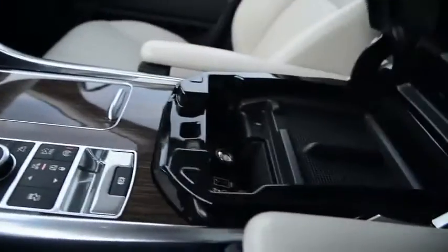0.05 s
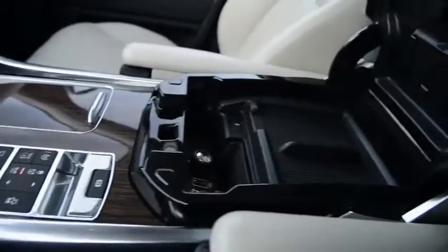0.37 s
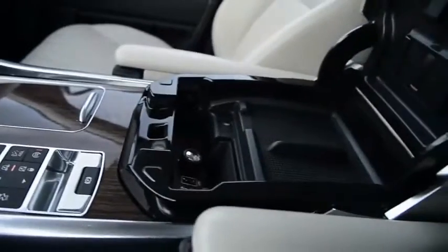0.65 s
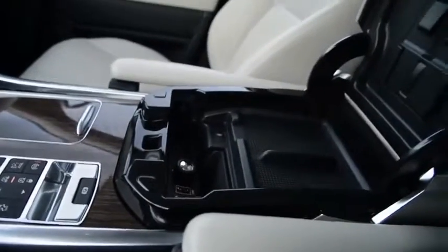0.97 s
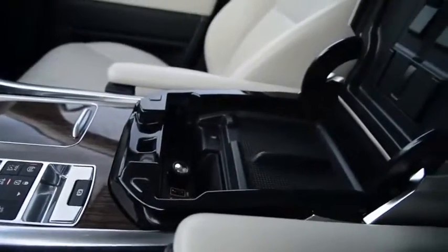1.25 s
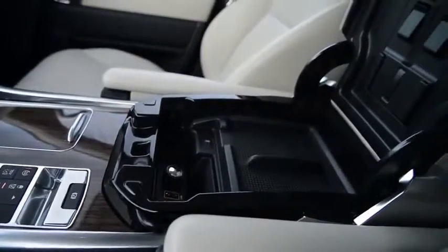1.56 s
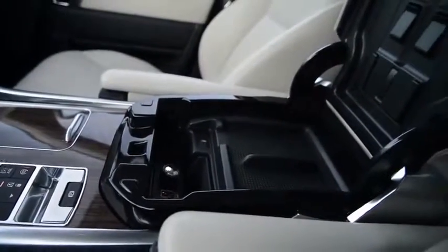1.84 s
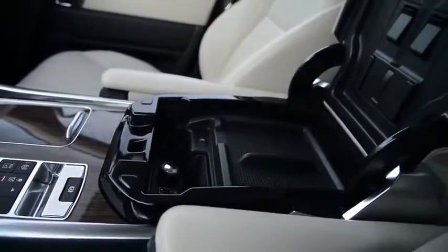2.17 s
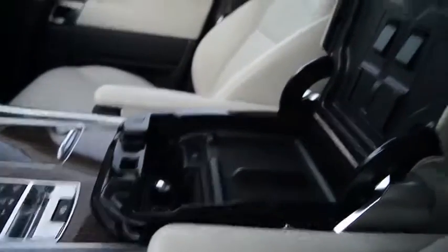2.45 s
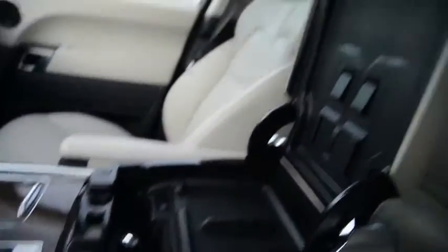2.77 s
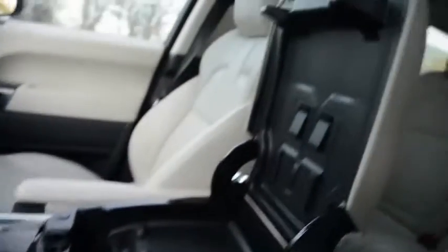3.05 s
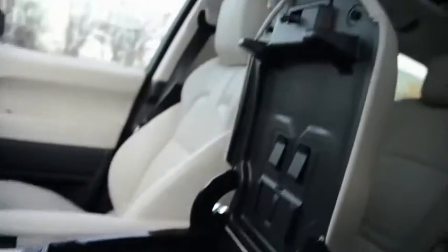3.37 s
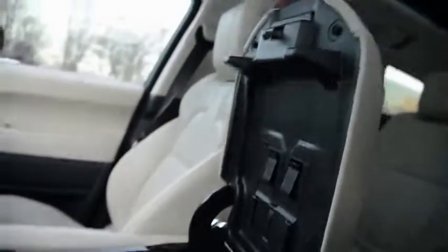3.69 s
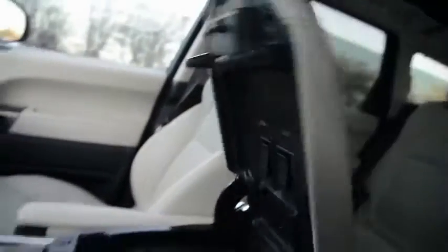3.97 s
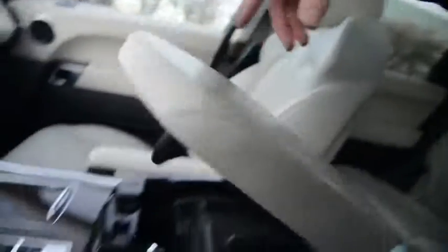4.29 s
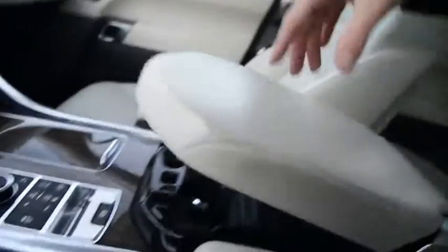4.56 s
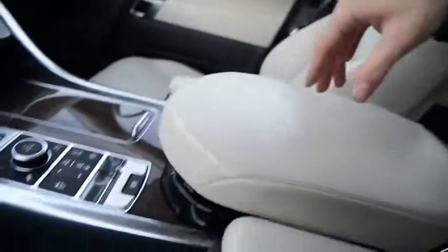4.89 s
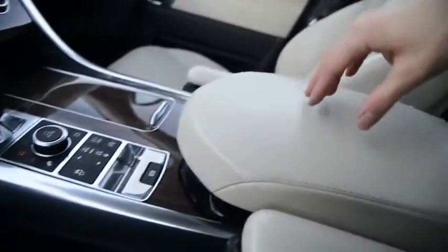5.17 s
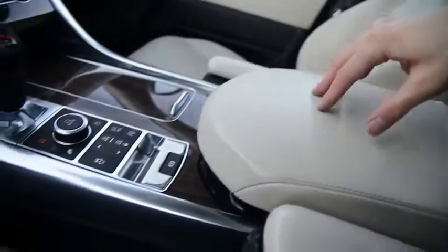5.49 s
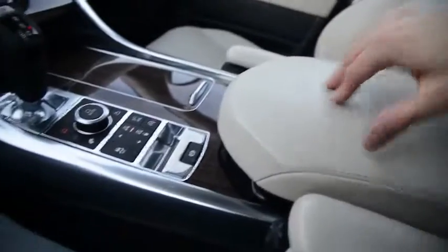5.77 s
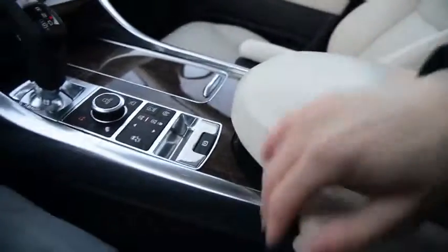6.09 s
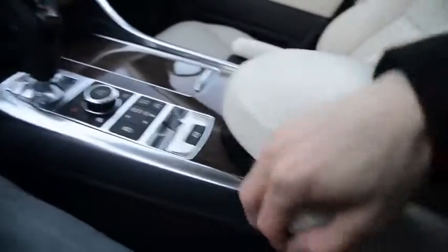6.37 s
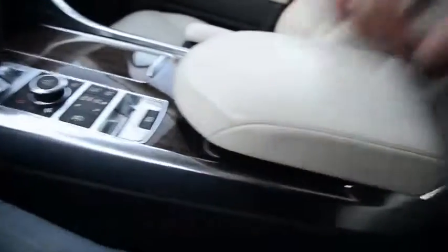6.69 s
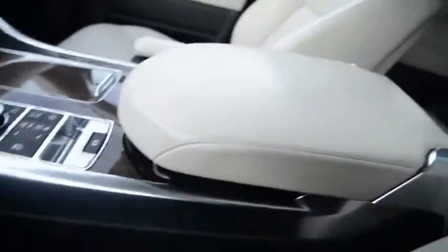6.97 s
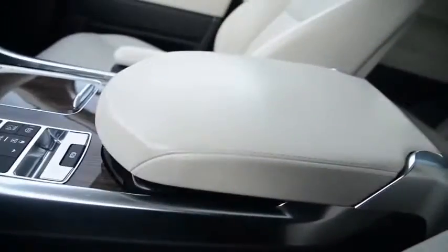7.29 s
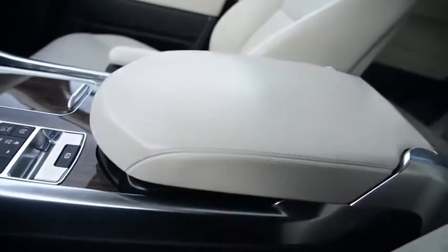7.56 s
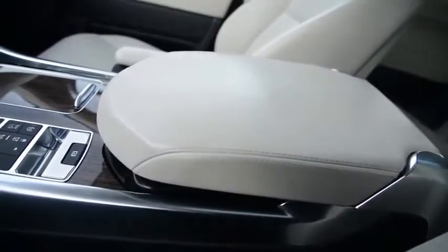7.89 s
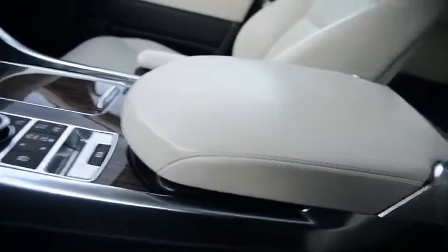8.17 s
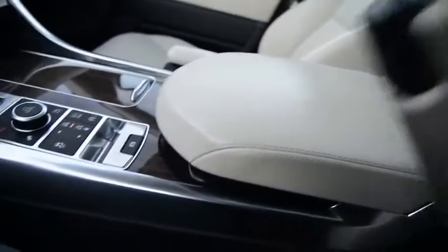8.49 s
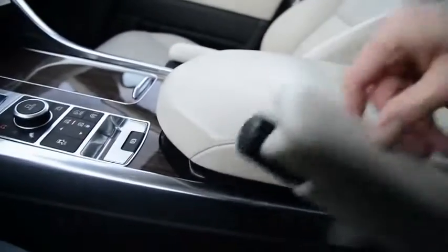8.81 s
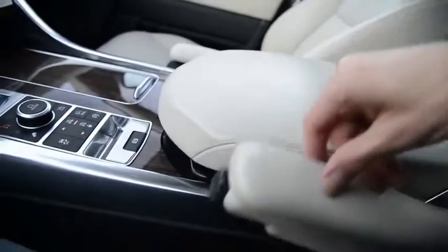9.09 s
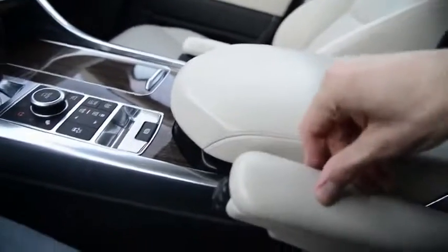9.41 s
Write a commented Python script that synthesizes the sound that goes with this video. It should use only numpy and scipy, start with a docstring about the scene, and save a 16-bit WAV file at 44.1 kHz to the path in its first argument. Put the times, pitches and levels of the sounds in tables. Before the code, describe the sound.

Heard close up inside a parked car, the engine idles with a steady low hum, cabin rumble and a faint fan whine. A plastic console tray knocks once, followed by a few light ticks. About halfway through, the padded lid lands with a hollow thunk and its latch snaps shut, the loudest moment. Afterwards come a few small clicks and the soft rubbing of a sleeve and leather as an armrest is moved.

```python
"""Centre console in an idling car

Inside a parked car a six-cylinder engine hums in periodic firing pulses, over cabin rumble and a faint
fan whine. A hand clicks the plastic tray, lowers the padded lid and presses it until the latch snaps;
each impact excites the console's resonant modes. Then an armrest swings up and down, and leather and
sleeve rub softly by stick-slip friction."""
import sys
import numpy as np
from scipy import signal
from scipy.fft import rfft, irfft, next_fast_len
from scipy.io import wavfile

SR = 44100
rng = np.random.default_rng(int(sys.argv[2]) if len(sys.argv) > 2 else 0)


def generate_wav(sig):
    """Save sig (samples, or channels by samples) to the path in sys.argv[1] as 16-bit PCM at SR."""
    pcm = np.round(np.clip(np.atleast_2d(sig).T, -1, 1) * 32767).astype(np.int16)
    wavfile.write(sys.argv[1], SR, pcm)


N = 425124


def from_db(db):
    """Amplitude ratio of a level in decibels."""
    return 10 ** (np.asarray(db) / 20)


def unit_rms(x):
    """Normalisation to unit mean power."""
    return x / np.sqrt(np.mean(x ** 2) + 1e-20)


def in_time(rows):
    """Linear interpolation in time, one curve per value column."""
    times_s, *columns = np.transpose(rows)
    return [np.interp(np.arange(N) / SR, times_s, column) for column in columns]


def at_hz(points, hz):
    """Interpolation on a logarithmic frequency axis."""
    points_hz, values = np.transpose(points)
    return np.interp(np.log(hz + 1e-9), np.log(points_hz), values)


def panned(db):
    """Interaural level difference, left minus right, as a pair of gains."""
    return from_db(np.array([[.5], [-.5]]) * db)


def drift(rate_hz):
    """Random modulation: low-pass noise of unit rms."""
    hz = np.fft.rfftfreq(N // 40, 40 / SR)
    slow = irfft(rfft(rng.standard_normal(N // 40)) / (1 + (hz / rate_hz) ** 2))
    return np.interp(np.linspace(0, len(slow) - 1, N), np.arange(len(slow)), unit_rms(slow))


def resonate(x, hz, width_hz):
    """Damped resonance: two poles, unit gain at the peak."""
    radius = np.exp(-np.pi * width_hz / SR)
    feedback = [1, -2 * radius * np.cos(2 * np.pi * hz / SR), radius ** 2]
    return signal.lfilter(np.array([1, 0, -1]) * (1 - radius ** 2) / 2, feedback, x)


def narrow_noise(hz, width_hz, size):
    """Narrow-band stereo noise: white noise passed twice through a resonance; unit rms."""
    white = rng.standard_normal((2, size))
    return unit_rms(resonate(resonate(white, hz, width_hz), hz, width_hz))


def cabin_noise(spectrum, size=N):
    """Interaural coherence: coloured noise, alike at both ears in the bass, diffuse above; unit rms."""
    # likeness of the two ears: frequency_hz, correlation (clipped to 1)
    coherence = [(60, 0.66), (130, 1.3), (290, 0.26), (640, -0.18), (12000, 0.11)]
    # left level over right: frequency_hz, difference_db
    balance = [(60, 5.5), (110, 0), (250, -2), (700, -3.5), (2400, 0), (4400, 0), (10000, 1)]
    padded = next_fast_len(size, real=True)
    hz = np.fft.rfftfreq(padded, 1 / SR)
    mid, side = rfft(rng.standard_normal((2, padded)))
    alike = np.clip(at_hz(coherence, hz), -1, 1)
    ears = np.sqrt(1 + alike) * mid + np.sqrt(1 - alike) * side * [[1], [-1]]
    low_cut = 1 / (1 + (spectrum[0][0] / (hz + 1) / 1.3) ** 6)
    high_cut = 1 / (1 + (hz / spectrum[-1][0] / 1.3) ** 6)
    colour = low_cut * high_cut * from_db(at_hz(spectrum, hz))
    return unit_rms(irfft(ears * colour * panned(at_hz(balance, hz)), padded)[:, :size])


def add(out, start_s, sound):
    """Superposition of a short sound at a given time."""
    start = round(start_s * SR)
    out[:, start:start + sound.shape[-1]] += sound[..., :N - start]


def engine(upper_pan_db=-3.0, left_lead_s=0.00063):
    """Harmonic series: overtones align in one pulse per firing and follow the idle speed, wavering."""
    # idle speed and strength of the firing tone: time_s, firing_hz, level_db
    idle = [(0, 42.11, -25), (0.8, 41.74, -25), (2.3, 41.92, -25.5), (2.7, 42.2, -24.8),
            (4.9, 41.89, -25.5), (5.35, 42.32, -24.9), (5.9, 41.86, -25.7), (6.8, 42.14, -24.5),
            (8.1, 43.08, -24.5), (8.6, 42.72, -25), (9.15, 41.5, -26.5), (9.64, 41.84, -26.5)]
    # partials of the firing tone: multiple, relative_db, unsteadiness (0-1)
    # 5/6 comes from uneven cylinders, 3.4 from a belt-driven part
    partials = [(5 / 6, -34, .3), (1, 0, 0.028), (2, -23, 0.39), (3, -15.5, 0.1), (3.386, -17.5, 0.21),
                (6.66, -32.5, 0.48), (9.85, -36, 0.31)]
    firing_hz, firing_db = in_time(idle)
    cycles = np.cumsum(firing_hz) / SR + np.array([[1], [0]]) * firing_hz * left_lead_s
    phase, out = 2 * np.pi * cycles - np.pi / 2, 0
    for multiple, db, unsteady in partials:
        amplitude = 1 + unsteady * drift(rate_hz=3.8)
        tone = amplitude * np.cos(multiple * phase + unsteady * drift(rate_hz=4.9))
        out = out + from_db(db) * panned(upper_pan_db * (multiple > 2)) * unit_rms(tone)
    return out * from_db(firing_db)


def rumble(level_db=-36.5, waver_db=0.5):
    """Structure-borne noise: the body shell passes mostly low frequencies."""
    # spectral density: frequency_hz, relative_db
    spectrum = [(18, 7.5), (32, -2), (60, -1.5), (100, -7), (150, -9.5), (205, -10.5), (245, -14),
                (290, -10), (340, -22.5), (430, -21), (560, -25.5), (900, -27.5), (1500, -36.5),
                (3000, -52.5)]
    return from_db(level_db + waver_db * drift(rate_hz=4.9)) * cabin_noise(spectrum)


def whistle(hz, waver_hz):
    """Frequency modulation: a wavering tone, a sixth of a cycle apart at the two ears; unit rms."""
    phase = 2 * np.pi * np.cumsum(hz + waver_hz * drift(rate_hz=21.1)) / SR
    return unit_rms(np.sin(phase + np.array([[0], [np.pi / 3]])))


def fan_whine(pitch_hz=800, gain_db=4.5, pan_db=-5.0):
    """Tonal fan noise: a tone beats with an equally strong narrow band of noise around it."""
    # rise and fall of the whine: time_s, relative_db
    swell = [(0, -76), (0.5, -75), (0.85, -66.5), (1.7, -65), (2.05, -68), (2.9, -62.5), (4.0, -65),
             (4.7, -72.5), (6.1, -72.5), (7.0, -67.5), (9.64, -71)]
    flutter = narrow_noise(pitch_hz, width_hz=24, size=N)
    whine = unit_rms(flutter + whistle(pitch_hz, waver_hz=7))
    return from_db(in_time(swell)[0] + gain_db) * whine * panned(pan_db)


def cabin_air(hiss_db=-67.5):
    """Line and continuous spectra: thin whistles stand over a fine hiss."""
    # steady whistles: pitch_hz, level_db
    tones = [(3870, -88), (3942, -81.5), (7770, -93), (7845, -88)]
    # spectral density of the hiss: frequency_hz, relative_db
    spectrum = [(1000, 1), (2400, -2), (3300, -2.7), (7000, -1.1), (9500, -1.7), (15500, -1.3)]
    whistles = sum(from_db(db) * whistle(hz, waver_hz=20) for hz, db in tones)
    return whistles + from_db(hiss_db) * cabin_noise(spectrum)


def stroke_gains(release_s=.025, resting_rasp_db=-68.5, resting_swish_db=-74):
    """Incoherent sources add in power: envelopes of rasp and swish as strokes swell, hold and stop."""
    # hand, sleeve and armrest: start_s, end_s, swell_s, rasp_db, growth_db_per_s, swish_offset_db
    strokes = [(0, 0.62, 0.013, -63, -2.5, -7.5), (0.844, 1.0, 0.094, -58, 0, -13),
               (1.196, 1.5, .15, -64.5, 0, -12), (2.72, 3.1, 0.16, -58, -14, -9.5),
               (3.137, 3.7, 0.045, -65.5, -9, -8), (3.857, 4.07, 0.081, -58, -12, -9),
               (4.15, 4.9, 0.073, -64, -18, -6.5), (5.799, 6.55, 0.27, -64, -2, -7),
               (6.425, 7.24, 0.38, -51.5, 4.5, -5.5), (7.499, 7.8, .12, -63.5, -5, -11),
               (7.897, 8.82, 0.21, -51.5, -6, -7), (8.804, 9.327, 0.059, -60, -1, -7)]
    t = np.arange(N) / SR
    # clothes never lie quite still
    rasp, swish = from_db(resting_rasp_db) ** 2, from_db(resting_swish_db) ** 2
    for start_s, end_s, swell_s, db, growth_db_per_s, swish_offset_db in strokes:
        attack = np.clip((t - start_s) / swell_s, 0, 1)
        hold = from_db(db + growth_db_per_s * np.clip(t - start_s - swell_s, 0, end_s - start_s))
        release = np.exp(-np.maximum(t - end_s, 0) / release_s)
        power = (attack * hold * release) ** 2
        rasp = rasp + power
        swish = swish + power * from_db(swish_offset_db) ** 2
    return np.sqrt(rasp), np.sqrt(swish)


def through_cabin(source, spectrum, t60_s=0.086):
    """Reverberation: a source reaches each ear by its own short, dense reflections; unit rms."""
    t = np.arange(SR // 8) / SR
    reflections = cabin_noise(spectrum, size=len(t)) * from_db(-60 * t / t60_s)
    return unit_rms(signal.fftconvolve(source[None], reflections, axes=1)[:, :N])


def rubbing(rasp_gain_db=2.5, grain_db=3.5, grain_hz=120, moving_share=0.47, pan_db=-3.0):
    """Stick-slip friction: leather and cloth slide with a fine grain, sounding panel and surface."""
    # rasp of the panel: frequency_hz, relative_db
    rasp = [(350, -3), (750, 2.5), (950, -1), (1300, 0.5), (1580, 0), (1900, 0), (2150, 0.5), (2380, -2.5),
            (2580, -4), (2900, -14.5), (4000, -40)]
    # swish of the surface: frequency_hz, relative_db
    swish = [(2000, -33), (3000, 2), (4000, 1.5), (6000, 1), (7200, -3), (8100, -9), (9200, -15.5),
             (11500, -9.5), (15500, -13.5)]
    friction = rng.standard_normal(N) * from_db(grain_db * drift(grain_hz))
    rasp_gain, swish_gain = stroke_gains()
    out = 0
    for spectrum, gain in (rasp, rasp_gain * from_db(rasp_gain_db)), (swish, swish_gain):
        still = np.sqrt(1 - moving_share) * through_cabin(friction, spectrum)
        # the moving share of the contact smears the cabin's colouring
        moving = np.sqrt(moving_share) * cabin_noise(spectrum)
        out = out + gain * (still + moving)
    return out * panned(pan_db)


def contact(levels_db, pitch_hz, ring_q=8, ring_db=5, plain_db=-24, body_s=0.0094):
    """Impulse response: a crack and its reflections off the near trim, coloured by the console's modes."""
    # four bands of a click: low_hz, high_hz, gain_db, t60_s, crack_ratio (direct over reflected)
    registers = [(310, 1184, -1.5, 0.081, 11.3), (1073, 2240, -0.5, 0.067, 5.6),
                 (3050, 7130, -0.5, 0.071, 1.4), (7760, 15000, 0, 0.057, .6)]
    # console resonances: frequency_hz, width_hz, gain_db
    modes = [(388, 31, 0), (470, 18, -0.5), (521, 114, 2), (730, 97, 3), (900, 210, -6), (1177, 210, -2),
             (1578, 70, -1.5), (1775, 200, -11.5), (2184, 200, -8.5), (2460, 200, -10), (3370, 380, -20),
             (4300, 1200, -14), (6400, 1200, -16), (7200, 530, -17.5), (11500, 3600, -15)]
    rise_s, tail_db, tail_t60_s = .0016, -32, .18
    t, out = np.arange(SR // 8) / SR, 0
    # the reflections take a moment to build up behind the direct crack
    scatter = cabin_noise([(100, 0), (16000, 0)], size=len(t)) * (1 - np.exp(-t / rise_s))
    tail = from_db(tail_db - 60 * t / tail_t60_s)
    for (low_hz, high_hz, gain_db, t60_s, crack), db in zip(registers, levels_db):
        blow = scatter * (from_db(-60 * t / t60_s) + tail)
        blow[:, 0] += crack
        rung = sum(from_db(mode_db) * resonate(blow, hz, width) for hz, width, mode_db in modes)
        rung += from_db(plain_db) * blow
        # the touched part adds a pitch of its own
        rung += from_db(ring_db) * resonate(rung, pitch_hz, pitch_hz / ring_q)
        band = signal.sosfilt(signal.butter(3, [low_hz, high_hz], "band", fs=SR, output="sos"), rung)
        # a register's level is its energy spread over the short body of the click
        body_rms = np.sqrt(np.sum(band ** 2, axis=1, keepdims=True) / (body_s * SR))
        out = out + from_db(db + gain_db) * band / body_rms
    return out


def clicks():
    """Impacts of tray, hinge and latch: heavy ones fill the lowest register, soft ones lack treble."""
    # plastic contacts: time_s, level_db, weight_db, slope_db_per_register, pitch_hz, pan_db
    contacts = [(0.7425, -44, -14, -10, 3270, -3), (0.986, -38, 5, -24, 860, -11),
                (0.994, -41, -5, -8, 1117, -6), (0.9979, -33, -1.5, -9.5, 1800, 0),
                (1.058, -54.5, 6, -13, 841, -6), (2.801, -64, 17.5, -14, 716, -10),
                (2.84, -53.5, 10.5, -15, 680, -6), (3.079, -52.5, 8, -27, 1703, -6),
                (3.221, -52, -2, -4, 2320, 0), (3.378, -61, 13, -14, 758, -6),
                (4.2852, -48, -7, -9.5, 2400, -3), (5.15, -28.5, -3.5, -16, 1556, -2.5),
                (5.234, -39, -2, -22.5, 1530, -5), (5.508, -25, 4, -18, 2330, -1),
                (5.517, -19, 5, -18, 2200, -5), (5.562, -22, 5, -11.5, 3100, -1),
                (5.698, -53, -10, -14, 2370, 0), (5.746, -46.5, -4, -13, 2380, -1),
                (5.81, -46.5, -10, -21, 1710, 1), (6.475, -45, 2.5, -18, 690, -6),
                (6.592, -45, -7, -19, 2200, 0), (7.231, -34.5, -5.5, -22.5, 2100, -9.5),
                (7.288, -53.5, -5, -30, 1710, -15), (9.137, -55, 4, -14, 1598, -8)]
    out = np.zeros((2, N))
    for time_s, db, weight_db, slope_db, pitch_hz, pan_db in contacts:
        levels_db = (db + weight_db, db, db + slope_db, db + 2 * slope_db)
        add(out, time_s, contact(levels_db, pitch_hz) * panned(pan_db))
    return out


def struck(modes):
    """Free vibration: one blow sets off exponentially decaying sines."""
    t = np.arange(SR // 2) / SR
    return sum(from_db(db - 60 * t / t60_s) * np.sin(2 * np.pi * hz * t) for hz, db, t60_s in modes)


def console_boom():
    """Modal excitation: heavy blows shake the whole console in its lowest modes."""
    # heavy blows: time_s, level_db
    thumps = [(0.996, -29.5), (5.515, -37), (5.562, -21)]
    # low modes: frequency_hz, relative_db, t60_s
    modes = [(86, 5.5, 0.079), (166, 3, 0.054)]
    out = np.zeros((2, N))
    for time_s, db in thumps:
        add(out, time_s, from_db(db) * struck(modes))
    return out


def scuffs():
    """Friction-driven resonance: noise swells briefly in one broad band as the leather grips."""
    # grips of the leather: peak_s, spread_s, centre_hz, width_hz, level_db
    grips = [(4.292, .008, 4900, 3000, -51.5), (5.27, 0.11, 1740, 200, -60), (7.05, 0.13, 2570, 400, -59),
             (7.159, 0.045, 4060, 500, -59), (8.30, 0.13, 2520, 398.7, -60),
             (8.751, 0.064, 6500, 2000, -62)]
    t, out = np.arange(SR) / SR - .5, np.zeros((2, N))
    for peak_s, spread_s, centre_hz, width_hz, db in grips:
        swell = from_db(db) * np.exp(-.5 * (t / spread_s) ** 2)
        add(out, peak_s - .5, swell * narrow_noise(centre_hz, width_hz, size=SR))
    return out


def latch():
    """Damped ringing: the lid lands with a hollow thunk, then its catch snaps home."""
    # modes of lid and catch: start_s, pitch_hz, level_db, t60_s
    modes = [(5.520, 509, -16, 0.11), (5.524, 385.4, -13, 0.079), (5.563, 478, -18, 0.072),
             (5.561, 1760, -16, 0.036), (5.562, 2624, -21.5, 0.028), (5.565, 4600, -28, 0.034)]
    out = np.zeros((2, N))
    for start_s, *mode in modes:
        add(out, start_s, struck([mode]))
    return out


def scene():
    """Superposition of the idling car and the handling of its console."""
    car = engine() + rumble() + fan_whine() + cabin_air()
    return car + clicks() + console_boom() + latch() + rubbing() + scuffs()


def record(dry):
    """Band limiting: a steep low-pass removes the highest treble."""
    cutoff_hz = 15750
    return signal.sosfilt(signal.ellip(10, .1, 80, cutoff_hz, fs=SR, output="sos"), dry)


dry = scene()
out = record(dry)
generate_wav(out)
```